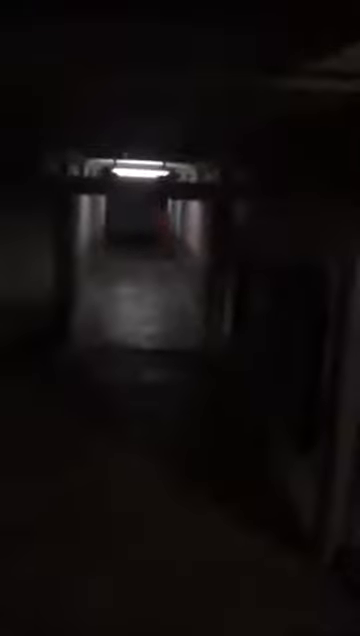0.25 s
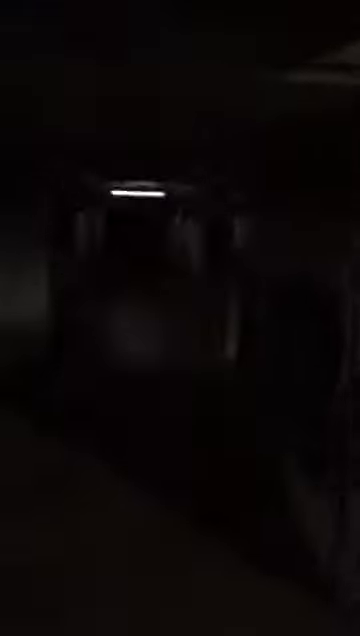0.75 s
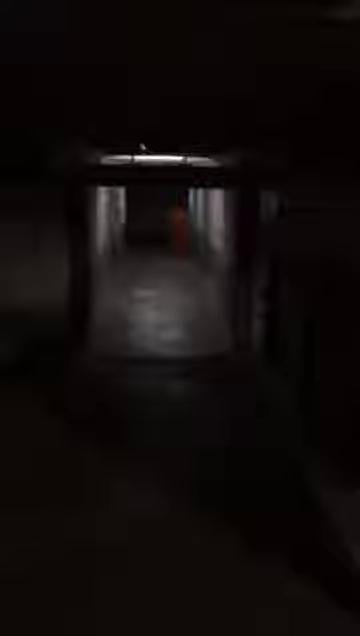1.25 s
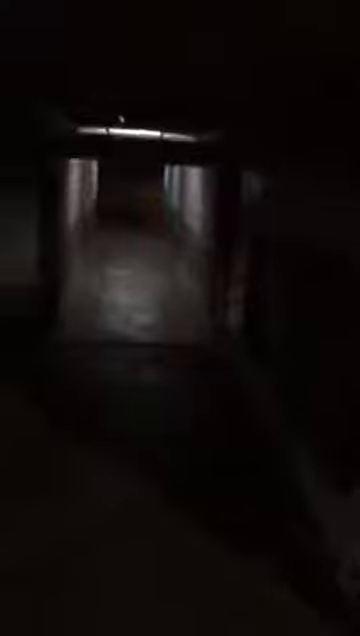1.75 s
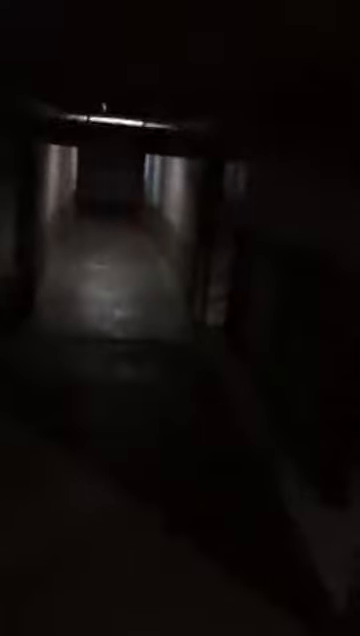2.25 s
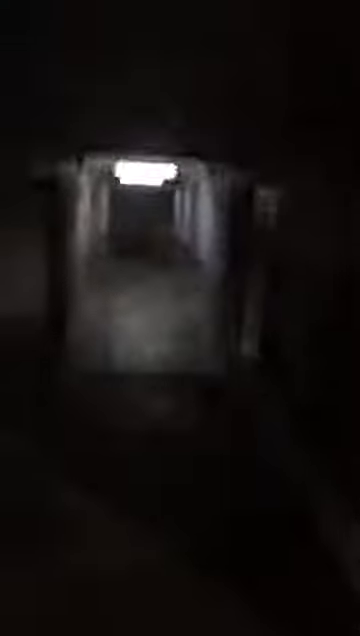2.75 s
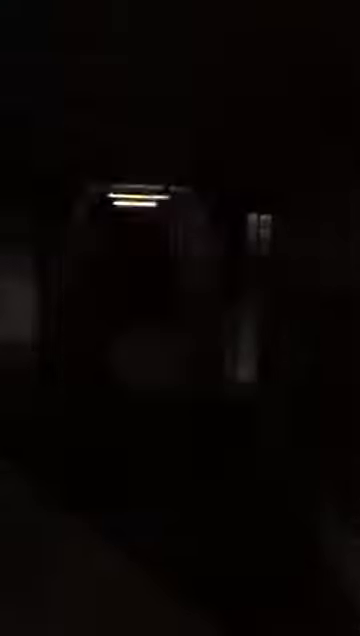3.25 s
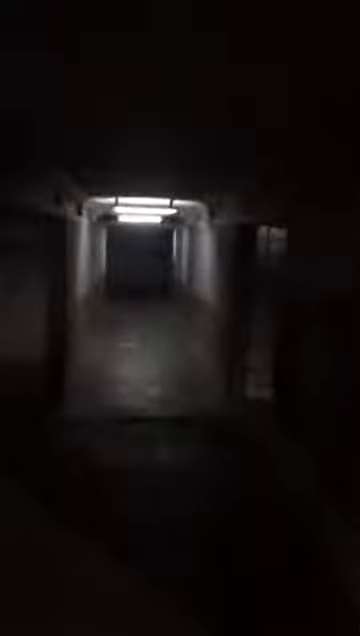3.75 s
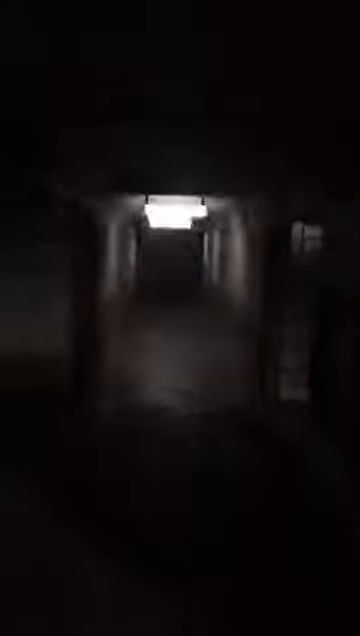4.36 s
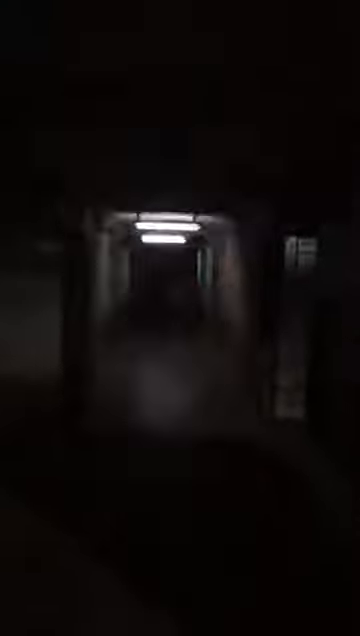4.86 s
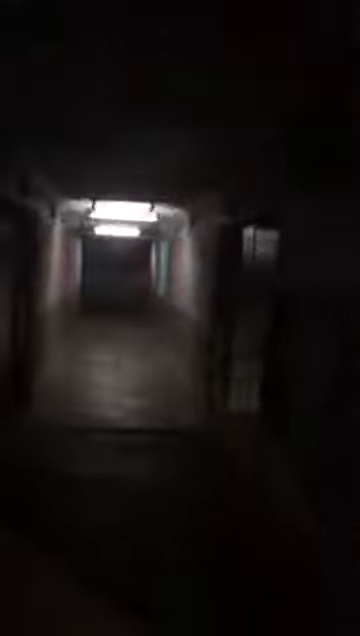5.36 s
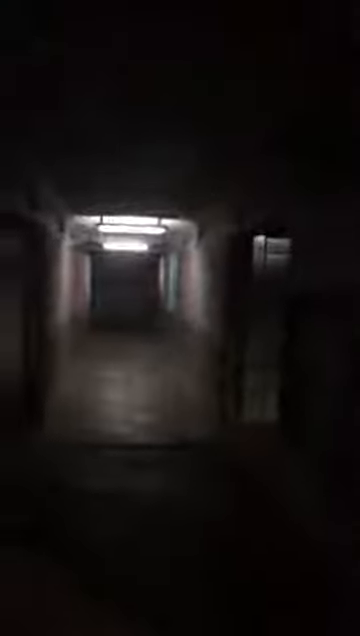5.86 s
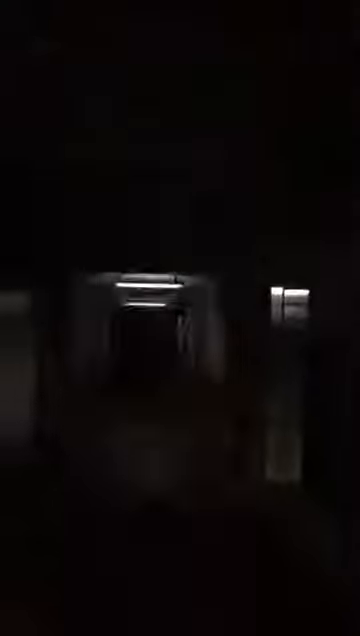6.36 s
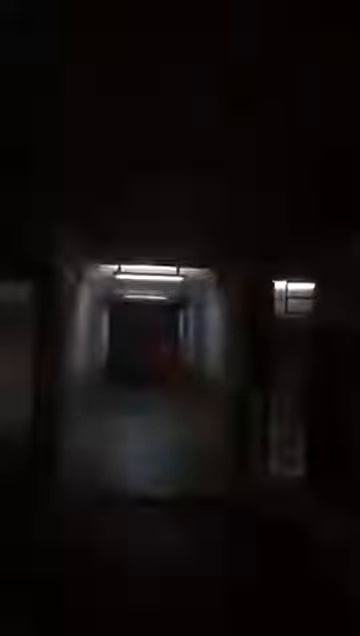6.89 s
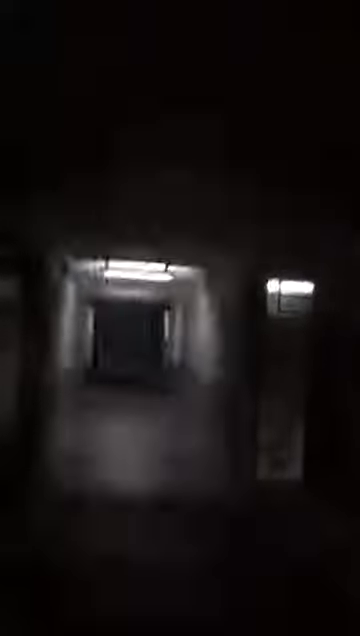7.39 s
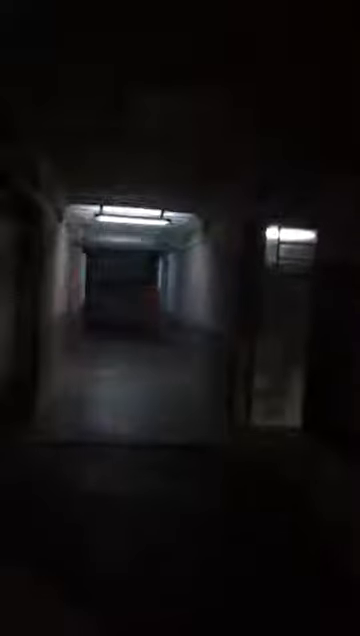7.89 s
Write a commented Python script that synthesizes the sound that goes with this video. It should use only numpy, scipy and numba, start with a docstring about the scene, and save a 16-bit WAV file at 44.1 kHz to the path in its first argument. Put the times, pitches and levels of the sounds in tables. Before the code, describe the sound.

A heavy door scrapes, then slams five times in a bare echoing corridor, over thin lamp hiss and an engine that coasts, then pulls harder.

```python
"""Lamps whine and a distant engine coasts: narrow-band hiss with buzz lines; exhaust orders, road noise, rumble.
A heavy door scrapes as it first swings (noise in uneven catches), then slams five times in a bare corridor.
Each slam is a latch strike, a crack and a crash carried on by decaying reflections, and the leaf's ringing modes.
From the first slams on the engine pulls; near the last one it changes up.
A gain control ducks under each slam throughout, and the top treble is cut."""
import sys
import numpy as np
from scipy import signal
from scipy.fft import rfft, irfft, next_fast_len
from scipy.io import wavfile
from numba import njit

SR = 44100
rng = np.random.default_rng(int(sys.argv[2]) if len(sys.argv) > 2 else 0)


def wav_out(sig):
    """Save sig, one row per channel (or a flat mono array), as 16-bit PCM at SR to the path in sys.argv[1]."""
    wavfile.write(sys.argv[1], SR, np.round(np.clip(np.atleast_2d(sig).T, -1, 1) * 32767).astype(np.int16))


N = 358533
T = np.arange(N) / SR
RING = T[:SR * 3 // 2]  # time axis of one slam [s]

# Colours set only the spectrum's shape where the noise is scaled to rms 1.
# exhaust pattern: (multiple of cycle rate, level [dB])
EXHAUST_ORDERS = [(2, -5.5), (3, -13), (4, 2), (5, -0.5), (6, -4), (7, -2), (8, 3.5), (9, -3.5), (10, 2),
                  (12, 0.5), (15, -4), (17, -1), (20, -0.5), (24, -1.5), (28, -5.5)]
# exhaust as it comes through the building: (frequency [Hz], gain [dB])
EXHAUST_PATH = [(40, -19.5), (70, -0.5), (100, -12), (128, 2), (155, -1), (190, -10), (260, -11.5),
                (350, -19.5), (470, -18.5), (540, -43), (620, -14.5), (690, -38), (750, -16.5), (900, -79)]
# mechanical rush colour: (frequency [Hz], density [dB per Hz])
RUSH_COLOUR = [(100, -13.5), (350, 6.5), (1200, 2), (2600, -8), (5000, -21.5), (10000, -27)]
# road noise colour: (frequency [Hz], density [dB per Hz])
ROAD_COLOUR = [(20, -14), (80, -4), (135, -1.5), (200, 0.5), (270, -5.5), (330, -9), (600, -12.5),
               (800, -18), (1150, -16.5), (2000, -26.5), (3200, -33.5), (5400, -35.5), (10000, -43.5)]
# low rumble colour: (frequency [Hz], density [dB per Hz])
RUMBLE_COLOUR = [(15, -30), (30, -5), (60, -1), (90, 8.5), (130, 6.5), (220, -31), (600, -68)]
# dull swells of the rumble: (time [s], level [dB], half length [s])
RUMBLE_SWELLS = [(6.5, -41, 0.12), (7.28, -32.5, 0.07)]
# lamp hiss colour: (frequency [Hz], density [dB per Hz])
LAMP_HISS_COLOUR = [(5000, -38), (5600, -6.5), (6100, 5.5), (6600, 7.5), (7100, 11.5), (7400, 7),
                    (7800, -5), (8400, -16.5), (10500, -60)]
# lamp buzz lines: (multiple of BUZZ_HZ, mean level [dB])
BUZZ_LINES = [(34, -71), (35, -71), (36, -66), (37, -66), (38, -63), (39, -61), (40, -62), (41, -69)]
# door scrape colour: (frequency [Hz], density [dB per Hz])
SCRAPE_COLOUR = [(530, -40), (900, -3), (1230, 1), (2100, 1), (2460, 4), (2790, -11), (3700, 6), (6110, -1),
                 (7150, 5.5), (10100, -11), (11000, -29), (14300, -51), (22000, -120)]
# slams: (time [s], level [dB], panel boom [dB], bass weight [dB], body [dB], treble [dB],
#         latch lead [s], shudder length [s])
SLAMS = [(0.549, -16, 3.5, -8, 0, -2, 0.008, 0.27), (2.228, -8.5, -0.5, 1, 1.5, -1.5, 0.013, 0.3),
         (3.963, -11, 1.5, 0, 1, -2, 0.015, 0.21), (5.719, -8, -2.5, 2.5, 0.5, -2.5, 0.013, 0.3),
         (7.437, -9, -3.5, 6.5, 1, -3.5, 0.015, 0.26)]
# modes of the door leaf: (nominal frequency [Hz], level [dB], t60 [s])
LEAF_MODES = [(109, -10.5, 0.53), (129.5, 0.5, 1.96), (153, -0.5, 1.9), (169.5, -1.5, 1.26),
              (184.2, -10, 2.43), (203.7, -1.5, 0.94), (219, -6, 0.15), (249.5, -9, 2.4),
              (281, -17.5, 0.42), (447.3, -14.5, 1.76), (465.6, -19, 0.5), (973, -29.5, 4),
              (1210, -22.5, 1.1), (2200, -31, 1.), (3900, -33, .9)]
# crash of leaf on frame: (frequency [Hz], density [dB per Hz])
CRASH_COLOUR = [(20, -12), (45, -2), (100, 6), (180, 15.5), (320, 6), (440, 3), (580, -0.5), (800, -5),
                (980, -0.5), (1350, -4), (1750, -4.5), (2500, -9.5), (5000, -14.5), (10500, -17)]
# first glancing reflections: (frequency [Hz], density [dB per Hz])
CRACK_COLOUR = [(40, -27), (200, 12), (1500, -23), (4000, 0), (10000, -9)]
# corridor decay: (frequency [Hz], t60 [s], time for which reflections keep the level up [s])
CORRIDOR_BANDS = [(80, .6, .12), (200, .75, .12), (500, 1.1, .15), (1200, 1.17, .17), (3000, 1.1, .11),
                  (6000, .88, .045), (10000, .78, .02)]
# long, dull tail from the rest of the building: (frequency [Hz], level against the crash [dB])
FAR_TAIL = [(100, -33), (400, -29), (1200, -17), (3000, -24.5), (8000, -40)]

# cycle rate sags while coasting, then climbs ever less keenly
COAST_HZ, SAG_HZ_PER_S = 22.68, 1.3
PULL_S, PULL_HZ_PER_S, PULL_TIRES_S = 1.7, 3.39, 44
THROTTLE_OPENS_S = 2.27  # duration
# change up: revs drop by the ratio and climb slowly again
SHIFT_S, SHIFT_LENGTH_S, GEAR_RATIO, HIGH_GEAR_HZ_PER_S = 7.22, 0.3, 0.83, 0.7
# levels at full throttle and cruising rate, change with throttle shut, growth with revs or speed
CRUISE_HZ = 30
EXHAUST_DB, EXHAUST_SHUT_DB, EXHAUST_DB_PER_OCTAVE = -33, -7.5, 5.5
ROAD_DB, ROAD_SHUT_DB, ROAD_DB_PER_OCTAVE = -43.5, 0.5, 3.5
RUSH_DB, RUSH_DB_PER_OCTAVE = -53.5, 24
RUMBLE_DB, RUMBLE_WANDER_DB = -48, 1.5
BUZZ_HZ = 180.13  # three times the mains rate
SCRAPE_S, SCRAPE_ATTACK_S, SCRAPE_DB, SCRAPE_FADE_DB_PER_S = 0.368, 0.057, -44, 59
BLOW_RISE_S, LATCH_RISE_S = 0.005, 0.006  # attacks rounded by distance
FAR_T60_S = 3.7
TOP_HZ = 10580


def undb(db):
    """Decibels to amplitude gain."""
    return 10 ** (np.asarray(db) / 20)


def unit(x):
    """Scale to rms 1."""
    return x / np.sqrt(np.mean(x ** 2))


def at_hz(rows, hz, axis=1):
    """Interpolate one table column on a log frequency axis."""
    rows = np.array(rows)
    return np.interp(np.log(np.maximum(hz, 1)), np.log(rows[:, 0]), rows[:, axis])


def tint(x, rows):
    """Filter x by a gain curve of (frequency [Hz], gain [dB])."""
    gain = undb(at_hz(rows, np.fft.rfftfreq(len(x), 1 / SR)))
    return irfft(rfft(x) * gain, len(x))


def noise(rows):
    """Coloured noise of full length, rms 1."""
    white = rng.standard_normal(next_fast_len(N))
    return unit(tint(white, rows)[:N])


def burst(rows):
    """Coloured noise as long as one slam, rms 1."""
    return unit(tint(rng.standard_normal(len(RING)), rows))


def walk(rate_hz, t=T):
    """Slow random wander: Gaussian points at rate_hz, joined by straight lines."""
    return np.interp(t * rate_hz, np.arange(400), rng.standard_normal(400))


def ramp(start_s, length_s):
    """Straight rise from 0 to 1."""
    return np.clip((T - start_s) / length_s, 0, 1)


def rise(time_s):
    """Exponential approach from 0 to 1: a rounded start."""
    return 1 - np.exp(-RING / time_s)


def decay(t60_s, t=RING):
    """Exponential decay by 60 dB in t60_s."""
    return np.exp(-np.log(1000) * t / t60_s)


def add(out, x, start_s):
    """Mix x into out from start_s on."""
    i = int(start_s * SR)
    out[i:i + len(x)] += x[:N - i]


def drive():
    """Coast, pull, change up: cycle rate [Hz], road speed [low-gear cycle rate, Hz], throttle [0-1]."""
    pulled_s = np.clip(T, PULL_S, SHIFT_S) - PULL_S
    coasting = COAST_HZ - SAG_HZ_PER_S * np.minimum(T, PULL_S)
    gained = PULL_HZ_PER_S * PULL_TIRES_S * (1 - np.exp(-pulled_s / PULL_TIRES_S))
    speed = coasting + gained
    shift = ramp(SHIFT_S, SHIFT_LENGTH_S)
    high_gear_climb = HIGH_GEAR_HZ_PER_S * np.maximum(T - SHIFT_S - SHIFT_LENGTH_S, 0)
    revs = speed * GEAR_RATIO ** shift + high_gear_climb
    throttle = ramp(PULL_S, THROTTLE_OPENS_S) * (1 - np.sin(np.pi * shift))  # lifts during the shift
    return revs, speed, throttle


def exhaust_orders(revs, flutter_db=4.0, rough=0.0018):
    """Multiples of the cycle rate move through the building's resonances; rms 1."""
    step = 10  # computed at a tenth of SR
    t, hz = T[::step], revs[::step]
    phase = 2 * np.pi * np.cumsum(hz * (1 + rough * walk(23, t))) * step / SR
    out = 0
    for k in range(2, 29):
        db = at_hz(EXHAUST_ORDERS, k) + at_hz(EXHAUST_PATH, k * hz) + flutter_db * walk(5, t)
        out = out + undb(db) * np.sin(k * phase + 2 * np.pi * rng.random())
    return unit(signal.resample_poly(out, step, 1)[:N])


def engine():
    """Exhaust orders and load-dependent mechanical rush follow revs; road noise follows speed; rumble swells."""
    revs, speed, throttle = drive()
    rev_octaves, speed_octaves = np.log2(revs / CRUISE_HZ), np.log2(speed / CRUISE_HZ)
    shut = 1 - throttle
    exhaust_db = EXHAUST_DB + EXHAUST_SHUT_DB * shut + EXHAUST_DB_PER_OCTAVE * rev_octaves
    exhaust = exhaust_orders(revs) * undb(exhaust_db)
    road_db = ROAD_DB + ROAD_SHUT_DB * shut + ROAD_DB_PER_OCTAVE * speed_octaves
    road = noise(ROAD_COLOUR) * undb(road_db + 0.5 * walk(8.7))
    rush = noise(RUSH_COLOUR) * throttle * undb(RUSH_DB + RUSH_DB_PER_OCTAVE * rev_octaves)
    swells = sum(undb(db) * np.exp(-((T - s) / half_s) ** 2) for s, db, half_s in RUMBLE_SWELLS)
    rumble_gain = undb(RUMBLE_DB + RUMBLE_WANDER_DB * walk(3)) + swells
    return exhaust + rush + road + noise(RUMBLE_COLOUR) * rumble_gain


def lamps(hiss_db=-51, waver_db=3):
    """Strip lights: narrow-band hiss plus wavering mains-harmonic lines."""
    drift = 0.5 * walk(27)  # phase shared by the lines [rad]
    lines = 0
    for k, db in BUZZ_LINES:
        level = undb(db + waver_db * walk(6.4))
        lines = lines + level * np.sin(2 * np.pi * k * BUZZ_HZ * T + drift + 1.2 * walk(3.5))
    return undb(hiss_db + 1.2 * walk(3.5)) * noise(LAMP_HISS_COLOUR) + lines


def scrape(grain_db=1.5):
    """The door's edge drags in uneven catches: noise with a quick onset, fading linearly in dB."""
    fade_db = SCRAPE_FADE_DB_PER_S * np.maximum(T - SCRAPE_S - SCRAPE_ATTACK_S, 0)
    level = undb(SCRAPE_DB - fade_db + grain_db * walk(110.4))
    return ramp(SCRAPE_S, SCRAPE_ATTACK_S) * level * noise(SCRAPE_COLOUR)


def contact(count=5, rebound=0.25, spread_s=0.08):
    """Impulses of unit energy: one hard blow and a few rebounds of the leaf in its frame."""
    force = np.zeros(len(RING))
    force[0] = 1
    for when, size in zip(rng.random(count), rng.standard_normal(count)):
        force[int(when * spread_s * SR)] += rebound * np.tanh(size)
    return force / np.linalg.norm(force)


def corridor(patchy_db=1.0, lumpy_db=0.94):
    """Response to a blow: clustered reflections hold, then decay band by band into a far tail."""
    grain = burst(CRASH_COLOUR) * undb(patchy_db * walk(110.0, RING))
    hz, spectrum = np.fft.rfftfreq(len(RING), 1 / SR), rfft(grain)
    out = tint(burst(CRASH_COLOUR), FAR_TAIL) * decay(FAR_T60_S)
    centres_hz = np.array(CORRIDOR_BANDS)[:, 0]
    for (_, t60_s, hold_s), pick in zip(CORRIDOR_BANDS, np.eye(len(CORRIDOR_BANDS))):
        band_gain = at_hz(np.c_[centres_hz, pick], hz)  # triangular, overlapping bands
        band = irfft(spectrum * band_gain, len(RING))
        echoes = undb(lumpy_db * walk(35.2, RING))
        held_time = np.hypot(RING, hold_s) - hold_s  # flat at first
        out = out + band * echoes * decay(t60_s, held_time)
    return out


def boom(shake_s, settle_s=0.017, rise_s=0.017, fade_s=0.16, detune=0.01127, wobble=0.94,
         ring_share=0.78, wander_rad=0.69):
    """The leaf's modes swell while it shudders in the frame, then ring out."""
    out = 0
    shudder_end = 1 + np.exp(np.minimum((RING - shake_s) / settle_s, 50))
    shudder = np.exp(-RING / fade_s) / shudder_end
    for hz, db, t60_s in LEAF_MODES:
        pitch_hz = hz + detune * min(hz, 200) * rng.standard_normal()
        swing = shudder * (1 + wobble * walk(25.4, RING)) + ring_share * decay(t60_s)
        # reflections from all sides make the phase wander
        phase = 2 * np.pi * (pitch_hz * RING + rng.random()) + wander_rad * walk(23.17, RING)
        out = out + undb(db) * swing * np.sin(phase.astype(np.float32))
    return out * rise(rise_s)


def door(latch_db=-15, boom_db=-6, crash_db=-2.5, crack_db=-17, crack_s=0.026, latch_s=0.14, swell_db=0.5):
    """Each slam: latch, crack of early reflections, crash through the corridor, boom of the panel."""
    out, walls = np.zeros(N), corridor()
    for s, db, panel_db, bass_db, body_db, treble_db, lead_s, shake_s in SLAMS:
        crash = signal.fftconvolve(contact(), walls)[:len(RING)] * undb(swell_db * walk(25.3, RING))
        crack = burst(CRACK_COLOUR) * np.exp(-RING / crack_s)
        panel = undb(boom_db + panel_db) * boom(shake_s)
        blow = undb(crash_db) * crash + undb(crack_db) * crack + panel
        weight = [(100, bass_db), (150, 0), (370, body_db), (1000, 0), (6000, treble_db)]
        blow = tint(blow, weight) * rise(BLOW_RISE_S)
        latch = undb(latch_db) * tint(burst(CRASH_COLOUR), weight) * np.exp(-RING / latch_s)
        fade_out = rise(0.097)[::-1]
        add(out, undb(db) * blow * fade_out, s)
        add(out, undb(db) * latch * rise(LATCH_RISE_S), s - lead_s)
    return out


def scene():
    """Engine, lamps and door at one microphone."""
    return (engine() + lamps() + scrape() + door())[None]


@njit
def follow(x, attack, release):
    """Envelope follower: fast rise, slow fall (coefficients per sample)."""
    out, e = np.empty(len(x)), 0.
    for i in range(len(x)):
        e += (abs(x[i]) - e) * (attack if abs(x[i]) > e else release)
        out[i] = e
    return out


def record(dry, knee_db=-13, attack_s=0.004, release_s=0.3, ahead_s=0.008):
    """Gain control ducks just ahead of each peak and recovers slowly; a steep low-pass cuts the top."""
    envelope = follow(dry[0], 1 / (attack_s * SR), 1 / (release_s * SR))
    envelope = np.interp(T + ahead_s, T, envelope)
    gain = np.sqrt(np.minimum(1, undb(knee_db) / (envelope + 1e-9)))  # two to one above the knee
    low_pass = signal.ellip(10, 0.2, 70, TOP_HZ, fs=SR, output="sos")
    return signal.sosfilt(low_pass, dry * gain)


dry = scene()
out = record(dry)
wav_out(out)
```